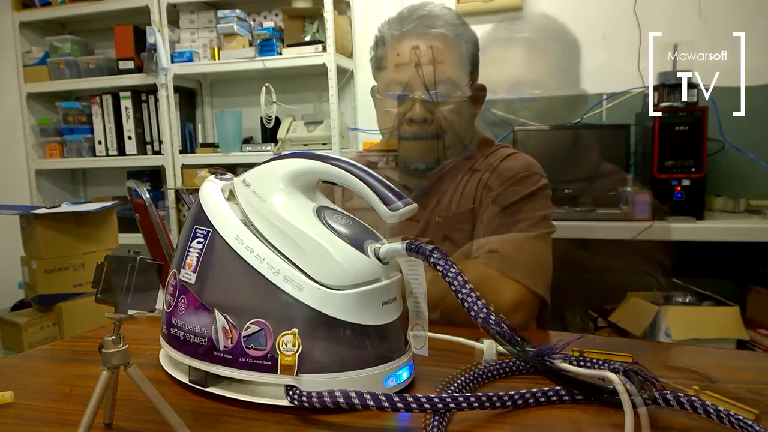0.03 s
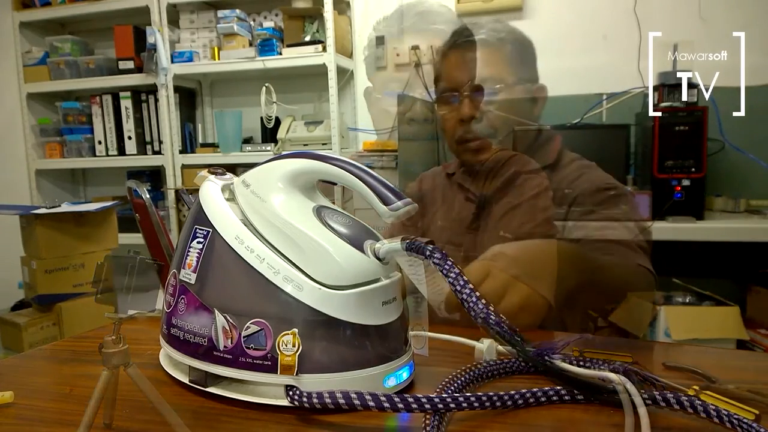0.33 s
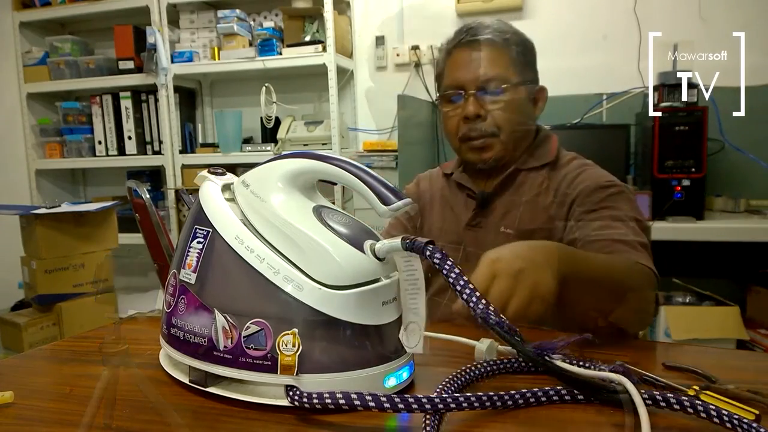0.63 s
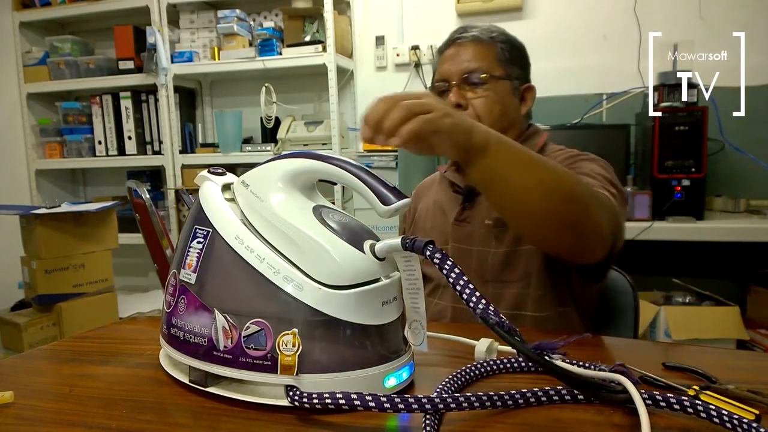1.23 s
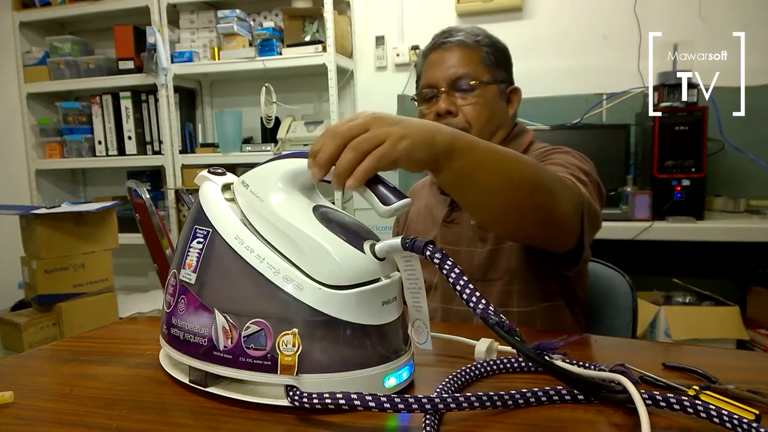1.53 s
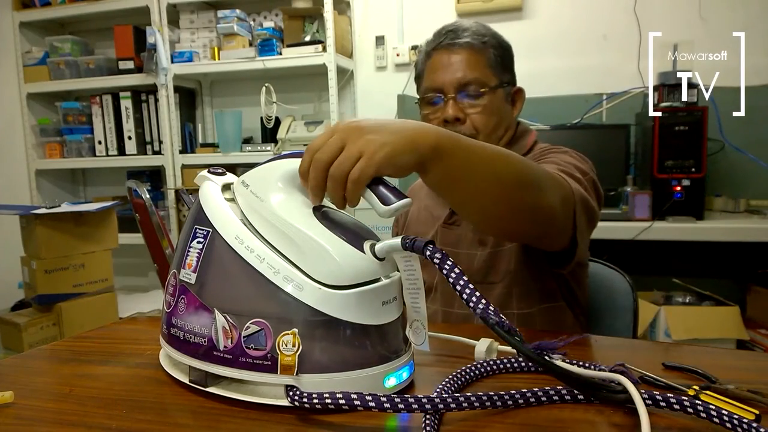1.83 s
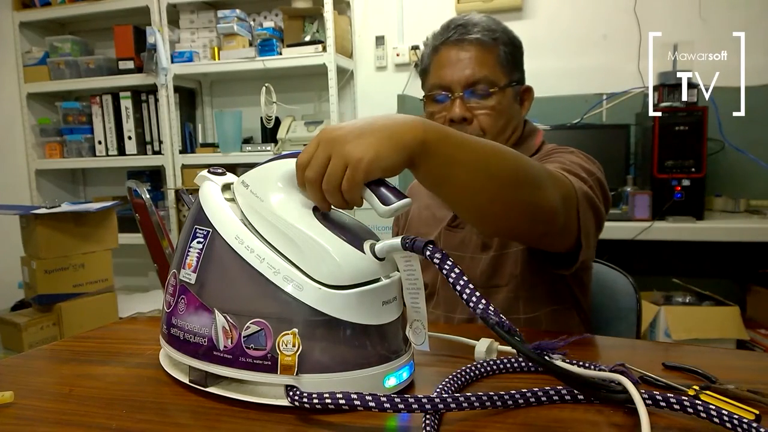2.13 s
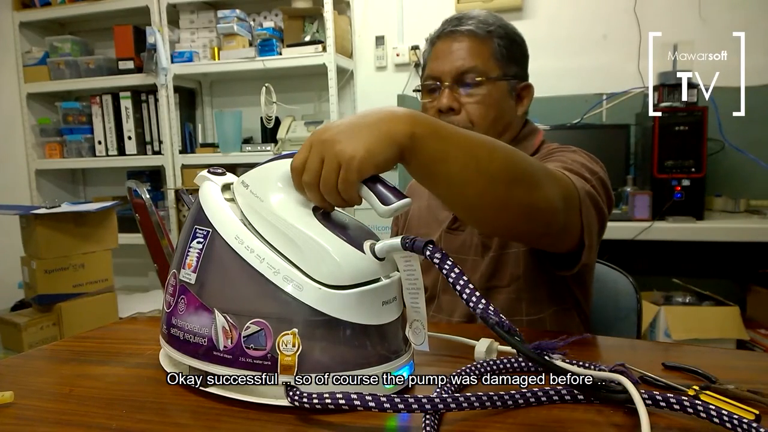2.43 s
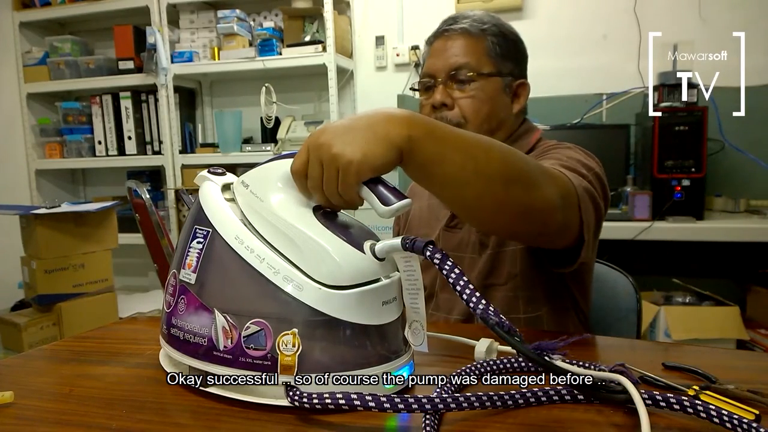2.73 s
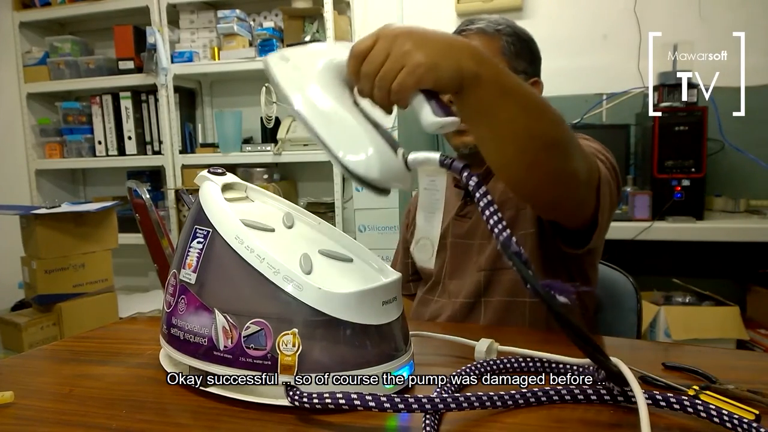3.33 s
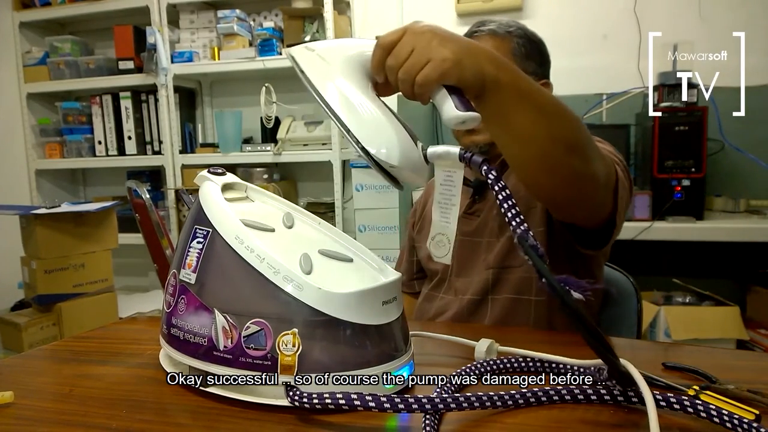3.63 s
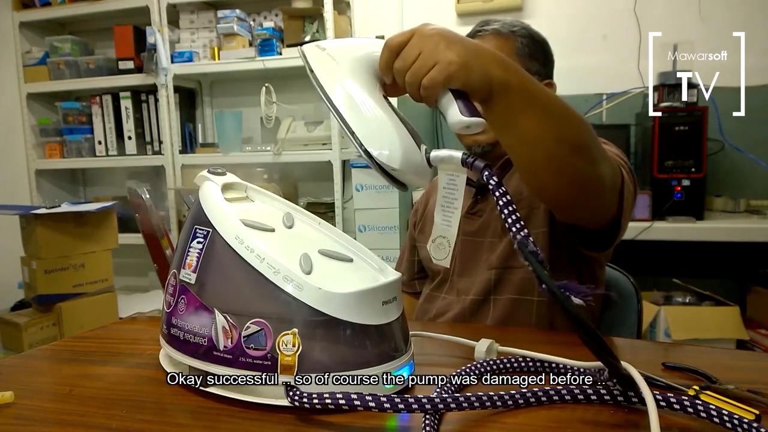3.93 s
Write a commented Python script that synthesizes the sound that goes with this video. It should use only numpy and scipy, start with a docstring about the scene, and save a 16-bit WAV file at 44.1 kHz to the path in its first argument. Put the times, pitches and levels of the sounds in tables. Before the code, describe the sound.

Steam hisses from an iron after a hollow plastic clunk and a valve snap.

```python
"""A steam iron in a small cluttered workshop, over the steady rumble of a fan.
First something clicks across the room. The air swells briefly and a hand brushes the iron's handle.
Near 2.9 s the plastic lock lets go of the base with a hollow clunk. Near 3.45 s the trigger ticks and
the valve snaps open. Steam runs up the hose and swells out of the soleplate, the iron's flat bottom:
a loud hiss that brightens, with a breathy rising whistle."""
import sys
import numpy as np
from scipy import signal
from scipy.fft import rfft, irfft, next_fast_len
from scipy.io import wavfile
from scipy.ndimage import map_coordinates

SR = 44100
rng = np.random.default_rng(int(sys.argv[2]) if len(sys.argv) > 2 else 0)


def master_out(mix):
    """Clip the mix to full scale and print it as 16-bit PCM to the path in sys.argv[1]."""
    frames = np.transpose(np.atleast_2d(mix))
    ceiling = np.clip(frames, -1, 1)
    pcm = np.round(ceiling * 32767).astype(np.int16)
    wavfile.write(sys.argv[1], SR, pcm)


N = 176400


# Steam leaving the soleplate. Each row: time in seconds, strength of the flow in dB.
STEAM_FLOW = [(3.48, -48), (3.54, -36), (3.57, -29), (3.605, -26.5), (3.739, -20), (3.87, -16.5),
              (4.0, -16.5)]
# The tone of the jets. Each row: frequency in Hz, level in dB.
JET_SPECTRUM = [(60, -18), (280, -12.5), (580, -2), (1100, -4.5), (2000, -2.5), (3100, -8.5), (4000, -3),
                (5600, -6.5), (6200, -19.5), (7400, -14.5), (8100, -20), (10000, -33), (12800, -25.5),
                (15500, -59)]
# Where the steam chamber and holes ring. Each row: frequency in Hz, width in Hz, boost in dB.
CHAMBER_PEAKS = [(700, 100, 2.5), (1816, 200, 3.5), (2705, 200, 4.5), (3470, 100, 0.5), (5700, 240, 4),
                 (6760, 320, 11.5), (7340, 170, 8.5), (11570, 390, 14)]
# The whistle's climb. Each row: time in seconds, pitch in Hz, level in dB.
WHISTLE_PATH = [(3.601, 3500, -39.5), (3.76, 3800, -30.5), (3.805, 4040, -22), (3.855, 4330, -23.5),
                (3.9, 4620, -24.5), (3.94, 4855, -26), (3.958, 4900, -20.5), (4.0, 4950, -30)]
# Bands that the echo off the table cancels. Each row: frequency in Hz, width in Hz, change in dB.
TABLE_DIPS = [(2400, 130, -4), (4620, 90, -4)]

def steam(flutter_db=0.8, sway_db=2, split_hz=2580, body_growth=0.8, treble_growth=2):
    """Jets hiss through the ringing chamber; air past an edge whistles higher as they speed up."""
    t = clock()
    times, levels = np.transpose(STEAM_FLOW)
    flow_db = np.interp(t, times, levels, left=-120) - levels.max()
    jet = shape_bands(noise(JET_SPECTRUM), CHAMBER_PEAKS)
    # Each chamber peak comes and goes on its own.
    sway = sum(band(jet, hz, width) * (amp(sway_db * wobble(20)) - 1) for hz, width, _ in CHAMBER_PEAKS)
    jet = unit(jet + sway)
    body = lowpass(jet, split_hz)
    # The treble grows faster with the flow than the body does, so the hiss brightens.
    hiss = body * amp(body_growth * flow_db + flutter_db * wobble(90))
    hiss += (jet - body) * amp(treble_growth * flow_db + flutter_db * wobble(90))
    times, pitches, whistle_db = np.transpose(WHISTLE_PATH)
    phase = 2 * np.pi * np.cumsum(np.interp(t, times, pitches)) / SR
    waver = wobble(640) + 1j * wobble(640)  # blurs a pure tone into a breathy one
    whistle = unit(np.real(waver * np.exp(1j * phase)))
    whistle *= amp(np.interp(t, times, whistle_db, left=-120))
    dry = shape_bands(amp(levels.max()) * hiss + whistle, TABLE_DIPS)
    return room(near_echoes(dry), wet_db=-7)


# The plunger hits its seat. Each row: start in seconds, level in dB, crack in dB relative to the hit.
VALVE_HITS = [(3.4495, -6.5, -21), (3.4613, -21.5, -5)]
# The valve's ringing tones. Each row: pitch in Hz, level in dB, fade time in seconds.
VALVE_MODES = [(403, 2.5, 0.022), (606, -0.5, 0.01), (1560, -12.5, 0.026), (1785, -11.5, 0.04),
               (2830, -22, 0.05), (5300, -21.5, 0.07), (5850, -28, 0.1), (6690, -25, 0.088),
               (12530, -26, 0.029)]
# The plunger's scrape. Each row: frequency in Hz, level in dB.
SCRAPE_SPECTRUM = [(150, -13), (2800, -8.5), (4200, -15), (5500, -3.5), (9200, -10.5), (11500, -18),
                   (15000, -26)]
# The first rush of steam in the hose. Each row: frequency in Hz, level in dB.
HOSE_SPECTRUM = [(100, -12), (600, 1.5), (1250, -19), (1750, 1.5), (2250, -29), (2750, -12.5),
                 (4500, -16.5), (6000, -11), (7200, -22), (15000, -31)]

def valve():
    """The plunger slides, thumps on its seat and lets steam into the hose."""
    crack = crack_noise()
    hits = np.zeros(N)
    for start, db, crack_db in VALVE_HITS:
        contact = amp(crack_db) * crack * decay(start, fade_s=0.018, attack_s=0.00018)
        hits += amp(db) * (strike(start, VALVE_MODES, contact_s=0.00015) + contact)
    scrape = amp(-21.5) * noise(SCRAPE_SPECTRUM) * decay(3.4457, fade_s=0.038, attack_s=0.00046)
    hose = amp(-33) * noise(HOSE_SPECTRUM) * decay(VALVE_HITS[0][0], fade_s=1.1, attack_s=0.0015)
    return room(hits + scrape, wet_db=-14.5) + hose


# The grip, then the lock, knock the base.
# Each row: start in seconds, level in dB, crack in dB relative to the knock.
BASE_KNOCKS = [(2.757, -34.5, -28), (2.829, -37, -20), (2.8753, -10, -2.5), (2.889, -20, -22)]
# The hollow base's tones. Each row: pitch in Hz, level in dB, fade time in seconds.
BASE_MODES = [(132.6, -22.5, 0.38), (356, 4.5, 0.045), (443, -8.5, 0.072), (656, -3, 0.073),
              (830, -1, 0.016), (1002, -4, 0.031), (1460, -10, 0.0091), (4230, -10, 0.0072)]
# The dense ring of shell and table. Each row: frequency in Hz, level in dB.
SHELL_SPECTRUM = [(60, 2), (200, 5), (1200, -9), (2800, -22), (4200, -27), (15000, -52)]

def lock(crack_lead_s=0.00051):
    """The catch slips off its edge with a bright snap; the hollow base rings and its shell shudders."""
    crack = crack_noise()
    shell = amp(-12) * noise(SHELL_SPECTRUM)
    snap = unit(band(rng.standard_normal(N), centre_hz=4150, width_hz=620))
    dry = amp(-14.5) * snap * decay(2.8747, fade_s=0.0084, attack_s=0.0001)
    for start, db, crack_db in BASE_KNOCKS:
        contact = amp(crack_db) * crack * decay(start - crack_lead_s, fade_s=0.021, attack_s=0.00027)
        shudder = shell * decay(start, fade_s=0.22, attack_s=0.00084)
        dry += amp(db) * (strike(start, BASE_MODES, contact_s=0.0011) + contact + shudder)
    return room(dry, wet_db=-17)


# The tone of a crack in the valve, lock or grip. Each row: frequency in Hz, level in dB.
CRACK_SPECTRUM = [(150, -22), (1000, 8), (2900, -10), (4300, -8), (5200, -22), (6100, -11), (7500, -34),
                  (15000, -35)]

def crack_noise():
    """Noise that, cut into a short burst, sounds like hard parts meeting."""
    return noise(CRACK_SPECTRUM)


# Light ticks of the grip and trigger. Each row: start in seconds, level in dB.
GRIP_TICKS = [(2.691, -34), (2.8183, -39), (3.435, -27), (3.4695, -32)]
# The plastic's tones. Each row: pitch in Hz, relative level in dB, fade time in seconds.
PLASTIC_MODES = [(3300, -5, 0.022), (3780, -1.5, 0.022), (4380, 0.5, 0.023)]

def ticks():
    """Plastic parts tick under the fingers."""
    crack = amp(-4) * crack_noise()
    dry = np.zeros(N)
    for start, db in GRIP_TICKS:
        contact = crack * decay(start, fade_s=0.024, attack_s=0.00036)
        dry += amp(db) * (0.51 * strike(start, PLASTIC_MODES, contact_s=0.0002) + contact)
    return room(dry, wet_db=-11)


# A distant rattle. Each row: start in seconds, level in dB, crack in dB relative to the click.
FAR_CLICKS = [(1.2904, -26, -3), (1.2954, -30.5, -4), (1.3025, -26.5, -8), (1.3235, -35.5, 4.5)]
# Its ringing tones. Each row: pitch in Hz, relative level in dB, fade time in seconds.
FAR_MODES = [(458, -2, 0.12), (1060, 0, 0.023), (1937, -8, 0.18), (3240, -4, 0.015)]
# The tone of its crack. Each row: frequency in Hz, level in dB.
FAR_CRACK_SPECTRUM = [(1100, 0), (2400, -5), (3600, -5), (5500, -10), (7500, -18), (15000, -32)]

def far_click():
    """A few quick contacts across the room, heard with plenty of echo."""
    crack = noise(FAR_CRACK_SPECTRUM)
    dry = np.zeros(N)
    for start, db, crack_db in FAR_CLICKS:
        contact = amp(crack_db) * crack * decay(start, fade_s=0.022, attack_s=0.0002)
        dry += amp(db) * (0.5 * strike(start, FAR_MODES, contact_s=0.0002) + contact)
    return room(dry, wet_db=-3.5)


# The hand on the handle. Each row: frequency in Hz, level in dB.
BRUSH_SPECTRUM = [(300, -8), (2300, -6), (4800, 3), (8000, -20), (15000, -28)]

def hand_brush(peak_s=1.68, width_s=0.14):
    """Skin slides softly over plastic."""
    return amp(-56.5) * noise(BRUSH_SPECTRUM) * bell(clock(), peak_s, width_s)


# The fan's rumble. Each row: frequency in Hz, level in dB.
FAN_SPECTRUM = [(10, -9), (24, 1.5), (64, -3.5), (110, -14), (190, -14), (320, -20.5), (780, -21.5),
                (1350, -25), (1900, -33.5), (2800, -40.5), (5200, -39.5), (7000, -50), (15500, -59.5)]

def fan(swell_db=2.2, gust_db=3, gust_s=1.63, gust_width_s=0.11):
    """Steady moving air with one soft gust, its lowest rumble swelling unevenly."""
    air = noise(FAN_SPECTRUM)
    low = lowpass(air, 130)
    rumble = low * amp(swell_db * wobble(16))
    gust = lowpass(air, 2000) * (amp(gust_db * bell(clock(), gust_s, gust_width_s)) - 1)
    return amp(-37) * (air - low + rumble + gust)


# The background hiss. Each row: frequency in Hz, level in dB.
HISS_SPECTRUM = [(30, 5), (700, -1), (3000, -2), (8000, 0), (15000, -1)]

def faint_hiss():
    """Quiet, steady noise, separate for left and right."""
    return amp(-57) * np.array([noise(HISS_SPECTRUM), noise(HISS_SPECTRUM)])


# How long the workshop echoes. Each row: frequency in Hz, fade time in seconds.
ROOM_FADES = [(150, 0.47), (1500, 0.37), (5000, 0.38), (14000, 0.22)]

def room(x, wet_db):
    """Add the short, blurred echo of shelves and walls; wet_db sets how loud it is."""
    hz, t, bands = signal.stft(rng.standard_normal(SR // 2), SR, nperseg=256)
    fade = amp(-60 * t / along(ROOM_FADES, hz)[:, None])
    tail = signal.istft(bands * fade, SR, nperseg=256)[1]
    tail = np.pad(tail / np.linalg.norm(tail), (SR // 300, 0))  # arrives about 3 ms late
    return x + amp(wet_db) * signal.fftconvolve(x, tail)[:N]


def near_echoes(x, count=7, spread_s=0.018, gain=0.07):
    """Add the first bounces off table and shelves, which colour the sound slightly."""
    delays = spread_s * (np.arange(count) + 1 + rng.random(count)) / count
    return x + gain * sum(np.pad(x, (int(delay * SR), 0))[:N] for delay in delays)


def strike(start, modes, contact_s):
    """One blow sets an object's tones (its modes) ringing; a longer contact softens the attack."""
    t = np.arange(SR // 3) / SR
    ring = np.zeros(len(t))
    for k, (hz, db, fade_s) in enumerate(modes):
        level = amp(db + rng.standard_normal() / 2 - 60 * t / fade_s)
        ring += (-1) ** k * level * np.sin(2 * np.pi * hz * t)
    out = np.zeros(N + SR)
    out[round(start * SR):][:len(t)] = ring * (1 - np.exp(-t / contact_s))
    return out[:N]


def decay(start, fade_s, attack_s):
    """A quick rise, then a fall of 60 dB in each fade time."""
    t = np.maximum(clock() - start, 0)
    return amp(-60 * t / fade_s) * (1 - np.exp(-t / attack_s))


def noise(spectrum):
    """Noise of strength 1; the table sets only the balance of low and high."""
    return unit(filtered(rng.standard_normal(N), lambda hz: amp(along(spectrum, hz))))


def filtered(x, response):
    """Scale each frequency by response(hz)."""
    size = next_fast_len(N + SR // 2)
    return irfft(rfft(x, size) * response(np.fft.rfftfreq(size, 1 / SR)), size)[..., :N]


def lowpass(x, cutoff_hz):
    """Keep the lows."""
    return filtered(x, lambda hz: 1 / (1 + (hz / cutoff_hz) ** 4))


def band(x, centre_hz, width_hz):
    """Keep one band of frequencies."""
    return filtered(x, lambda hz: bell(hz, centre_hz, width_hz))


def shape_bands(x, bands):
    """Turn the listed bands up or down."""
    return filtered(x, lambda hz: amp(sum(db * bell(hz, centre, width) for centre, width, db in bands)))


def wobble(rate):
    """A smooth curve through rate random points a second."""
    return map_coordinates(rng.standard_normal(int(N * rate / SR) + 4), [clock() * rate])


def along(points, hz):
    """Read between a table's rows, with octaves evenly spaced."""
    frequencies, values = np.transpose(points)
    return np.interp(np.log(hz + 1), np.log(frequencies + 1), values)


def bell(x, centre, width):
    """A smooth hump of height 1."""
    return np.exp(-((x - centre) / width) ** 2)


def amp(db):
    """Decibels to gain."""
    return 10 ** (np.asarray(db) / 20)


def unit(x):
    """Scale to an average strength (rms) of 1."""
    return x / np.sqrt(np.mean(x ** 2) + 1e-20)


def clock():
    """Time of every sample in seconds."""
    return np.arange(N) / SR


def scene():
    """Every source sits in the middle, over the faint hiss."""
    centre = fan() + hand_brush() + far_click() + ticks() + lock() + valve() + steam()
    return centre + faint_hiss()


def record(dry, top_hz=15800):
    """Cut off the very highest treble."""
    return filtered(dry, lambda hz: hz < top_hz)


dry = scene()
out = record(dry)
master_out(out)
```